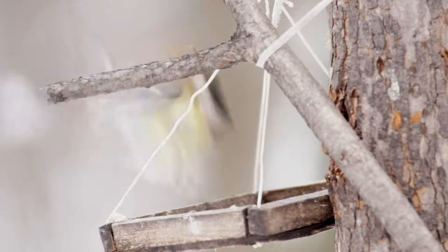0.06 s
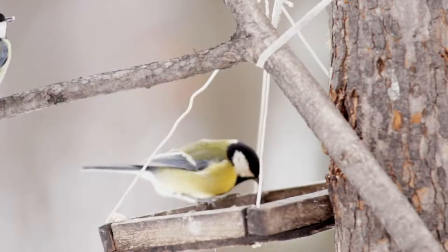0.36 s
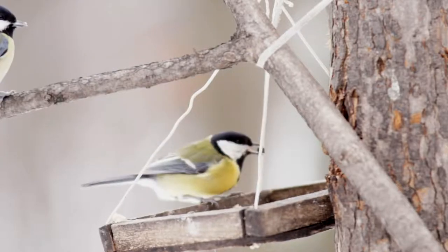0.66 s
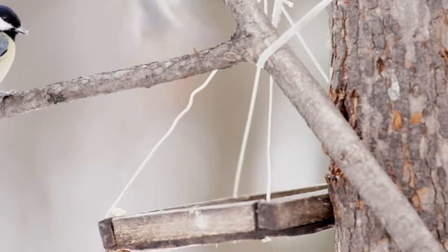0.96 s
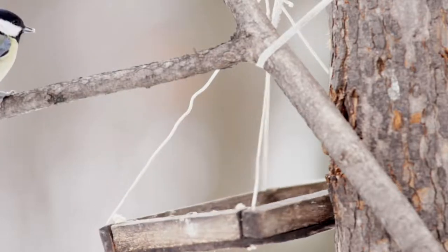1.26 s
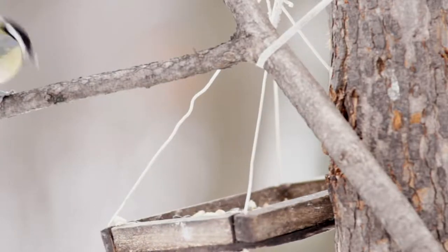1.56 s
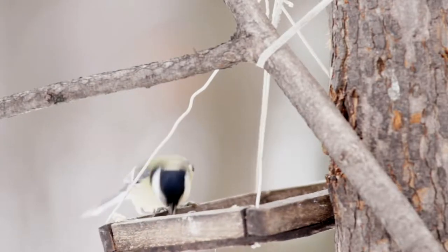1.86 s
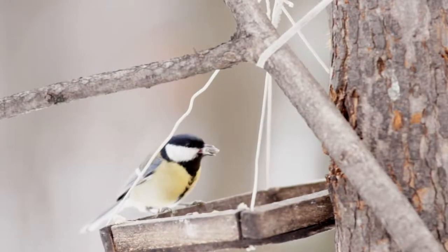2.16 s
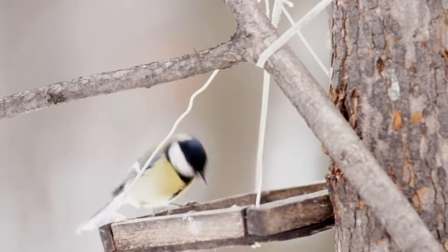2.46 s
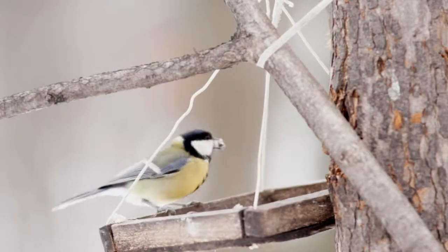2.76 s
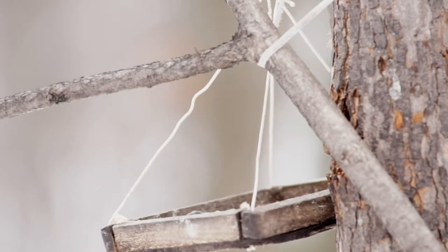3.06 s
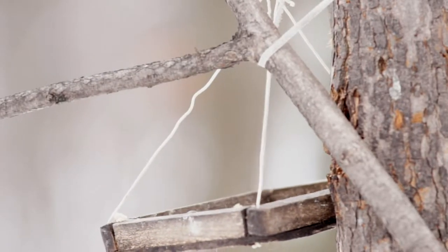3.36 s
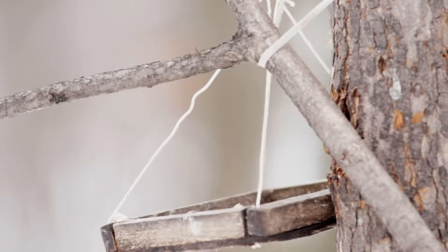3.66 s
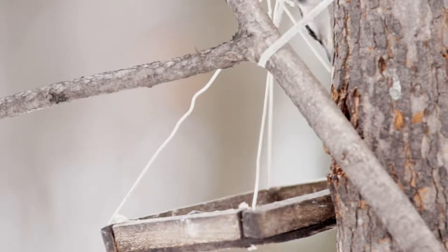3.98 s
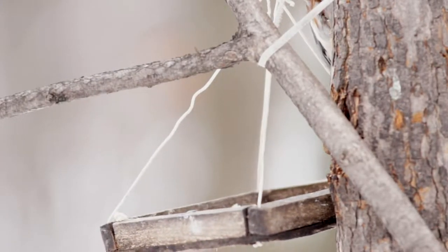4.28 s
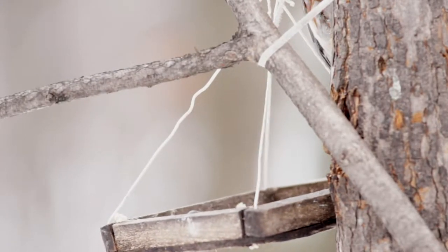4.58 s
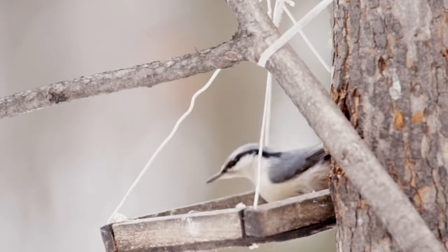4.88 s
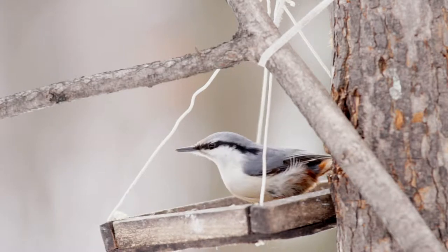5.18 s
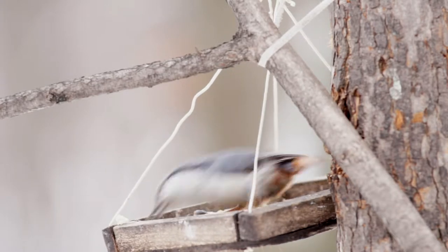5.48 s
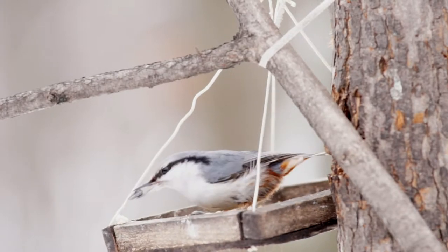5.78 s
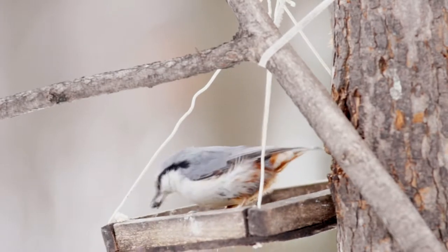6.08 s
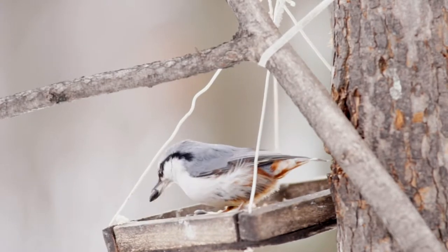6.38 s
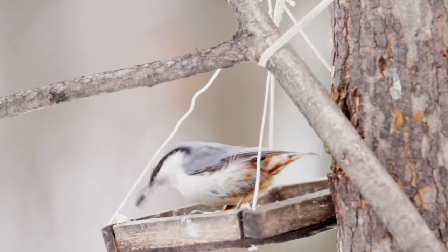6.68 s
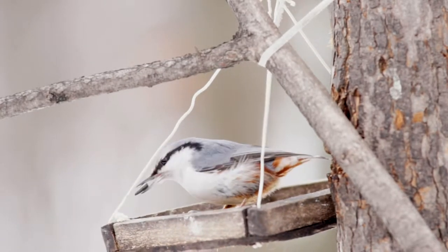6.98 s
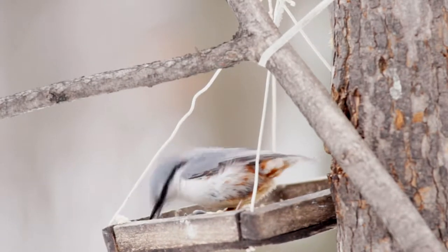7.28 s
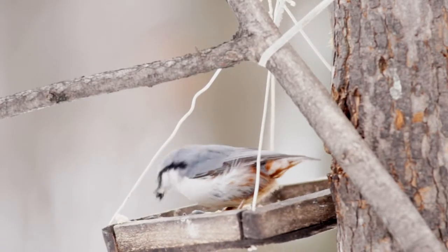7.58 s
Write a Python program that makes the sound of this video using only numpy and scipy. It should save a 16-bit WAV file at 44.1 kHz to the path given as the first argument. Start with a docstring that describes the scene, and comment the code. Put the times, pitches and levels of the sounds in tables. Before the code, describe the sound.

Small birds chirp around a feeder in a wood, over a low hum of distant traffic and a soft hiss. At first, gusts of wind rumble and thud on the microphone. As the wind eases, thin, sharp, very high chirps come close by, mixed with short, softer notes. Beaks and claws tick faintly on the tray and bark, and far birds call very quietly.

```python
"""First comes the hum of far traffic under a soft hiss, with wind thudding on two microphone ports.
Then small birds are heard around a feeder in a winter wood. Beaks and claws tick faintly, far birds
call, and close ones give thin, sharp chirps near 8 kHz and short arched contact notes.
Each call is a whistle from the syrinx, the bird's voice box, scattered by branches and trunks."""
import sys
import numpy as np
from scipy import signal
from scipy.fft import rfft, irfft, next_fast_len
from scipy.io import wavfile
from scipy.ndimage import uniform_filter1d, map_coordinates

SR = 44100
rng = np.random.default_rng(int(sys.argv[2]) if len(sys.argv) > 2 else 0)


def digitize_waveform(pressure):
    """Quantize a signal to 16-bit integers and store it at the path in sys.argv[1].

    Rows of a 2-D input are taken as channels; values are limited to [-1, 1].
    """
    field = np.atleast_2d(pressure).T
    bounded = np.clip(field, -1, 1)
    quanta = np.round(bounded * 32767).astype(np.int16)
    wavfile.write(sys.argv[1], SR, quanta)


N = 341334

# the tone colour of each noise: f/Hz, relative level/dB
TRAFFIC_COLOUR = [(30, -2.5), (110, -6), (170, -0.5), (230, 1), (300, -0.5), (400, -4.5), (650, -6.5),
                  (1000, -6), (1500, -11), (2000, -18.5), (3000, -33), (6000, -61)]
HISS_COLOUR = [(500, -43), (2000, 4), (3000, 1.5), (4000, -3.5), (5200, -1.5), (8000, -3.5), (11500, -5),
               (15500, -8)]
RUSTLE_COLOUR = [(800, -34), (2000, -2), (4000, 1), (6000, -7.5), (10000, -11.5), (15500, -15)]
WIND_COLOUR = [(10, -26), (22, -7.5), (45, 3.5), (70, 1.5), (110, -2), (170, -8), (260, -18.5), (450, -48),
               (1500, -90)]
# how alike left and right are: f/Hz, likeness (1 = the same, 0 = unrelated)
BACKGROUND_LIKENESS = [(60, 1), (290, 0.94), (640, 0.48), (1410, 0.25), (3100, -0.3), (6800, -0.089),
                       (15000, -0.14)]
WIND_LIKENESS = [(40, .75), (90, .5), (160, 0)]
# the low background hum, which wavers slowly and drops abruptly near 3.1 s: t/s, relative level/dB
HUM_LEVELS = [(0.2, -53), (0.22, -52.5), (0.55, -52.5), (1.85, -52), (2.18, -50), (2.38, -52.5),
              (3.02, -51.5), (3.1, -54), (6.13, -53.5), (6.24, -52), (6.57, -53), (7.6, -54)]
# bouts of rustling and gusts of wind: peak t/s, level/dB, half length/s
RUSTLE_BOUTS = [(2.7, -65, 0.37), (3.92, -61, 0.18), (4.52, -64.5, .08), (5.75, -59, 0.087),
                (6.2, -61, 0.24)]
WIND_GUSTS = [(.26, -42.5, 0.11), (.67, -42.5, .04), (.94, -38.5, 0.078), (1.29, -43, 0.049),
              (1.65, -45, .15), (2.01, -35.5, 0.047), (2.24, -43, 0.13), (2.78, -39.5, 0.16),
              (4.44, -46, 0.21), (4.76, -40.5, 0.067), (5.02, -45.5, 0.055), (5.35, -52.5, 0.11),
              (6.97, -49.5, .06)]
# the wind between gusts: t/s, level/dB
WIND_LULLS = [(0, -58.5), (2.9, -53), (3.1, -71), (3.7, -66), (4.3, -62), (5.9, -63.5), (6.2, -56),
              (7.3, -61.5), (7.7, -51.5)]
# beak and claw taps: t/s, peak level/dB, centre f/Hz, width/octaves, time to fade 60 dB/s
TAPS = [(.7665, -38.5, 12100, 0.62, .012), (2.8545, -44, 10000, .7, .012), (3.979, -51, 2600, .4, .03),
        (4.0951, -42, 2400, .12, .028), (4.1974, -45, 2500, .12, .028), (4.51, -45, 7000, 1, .025),
        (6.528, -46, 6960, 0.99, .025), (6.9844, -46, 11000, .5, .01), (7.4660, -43.5, 10900, .55, .012)]
# single puffs of air: t/s, peak level/dB, f/Hz, half length/s
AIR_PUFFS = [(0.983, -29.5, 65, 0.0075), (1.778, -27.5, 91, 0.0076), (2.094, -28, 110, 0.0088),
             (2.56, -27, 85, 0.0058), (2.678, -32, 70, 0.013), (2.822, -31.5, 131, .008),
             (3.031, -39, 66.3, .022), (4.799, -28, 104, 0.011), (7.734, -30, 76, .01)]
# sliding calls of far birds: t/s, relative level/dB, start f/Hz, end f/Hz, length/s
FAR_CALLS = [(1.668, -68, 7560, 7300, .04), (1.986, -61, 3900, 3600, .012), (2.149, -58, 3440, 4240, 0.015),
             (2.193, -62, 4900, 4250, .026), (2.71, -66, 7700, 7300, .035), (3.546, -58, 4350, 4250, .011),
             (3.568, -61, 7350, 6600, .018), (3.742, -57.5, 4500, 4960, 0.018),
             (5.145, -62, 4400, 5000, .009), (6.90, -66, 5300, 4360, .03), (7.608, -68, 7900, 7200, .042)]
# faint extra tones in a whistle: multiple of the pitch, relative level/dB
EXTRA_TONES = [(.5, -26.5), (1.5, -27), (2, -24.5)]
# full chirps: t/s, level/dB, crest f/Hz, dip f/Hz, length/s, fade over the call/dB,
# boost of the extra tones/dB, delay at the left port/ms
SHARP_CHIRPS = [(2.199, -62, 8500, 7300, .045, 8, 0, .15), (2.504, -39.5, 8450, 7950, .063, -4, -7, .174),
                (2.979, -46.5, 9100, 7900, .064, 7, -5, .17), (3.203, -34.5, 8570, 7660, .062, 5, -4, .09),
                (3.488, -35, 8400, 7520, .055, 8, -1, .092), (3.683, -37.5, 8280, 7200, .046, 5, -1, .103),
                (4.952, -32.5, 8950, 7880, .062, 4, -7, .086),
                (5.709, -35.5, 9000, 7720, .064, 6, -2, .094), (5.942, -38, 9000, 7350, .058, 8, 2, .096),
                (6.166, -47, 8080, 7050, .054, 7, 7, .125), (7.120, -50.5, 7780, 6700, .054, 6, 11, .138)]
# short arched notes: t/s, level/dB, crest f/Hz, length/s
CONTACT_NOTES = [(3.094, -45.5, 7380, 0.021), (3.371, -51, 7500, 0.028), (3.425, -52, 7340, 0.026),
                 (3.797, -56, 7250, 0.018), (4.202, -62, 7300, .022), (4.902, -53.5, 7300, 0.022),
                 (5.167, -50.5, 7230, 0.021), (6.678, -56, 7440, 0.029)]


def amp(db):
    """Turn decibels into a gain."""
    return 10 ** (np.asarray(db) / 20)


def unit(x):
    """Scale x to an average strength (rms) of 1."""
    return x / np.sqrt(np.mean(x ** 2) + 1e-20)


def along(points, hz):
    """Read a table of f/Hz, value on a log frequency axis."""
    f, values = np.transpose(points)
    return np.interp(np.log(hz + 1), np.log(f + 1), values)


def curve(rows):
    """Join rows of t/s, value with straight lines."""
    return np.interp(np.arange(N) / SR, *np.transpose(rows))


def wobble(rate, size):
    """A smooth curve through `rate` random values a second."""
    return map_coordinates(rng.standard_normal(4000), [np.arange(size) * rate / SR], mode="wrap")


def filtered(x, response):
    """Scale each frequency in x by response(hz)."""
    size = next_fast_len(x.shape[-1] + 8192)
    gains = response(np.fft.rfftfreq(size, 1 / SR))
    return irfft(rfft(x, size) * gains, size)[..., :x.shape[-1]]


def add(track, s, sound):
    """Mix a stereo sound into the track at s seconds."""
    part = track[:, round(s * SR):][:, :sound.shape[-1]]
    part += sound[..., :part.shape[-1]]


def noise(colour, likeness=BACKGROUND_LIKENESS):
    """Stereo noise with a given tone colour and left-right likeness."""
    def response(hz):
        angle = np.arccos(np.clip(along(likeness, hz), -1, 1)) / 2
        return amp(along(colour, hz)) * [np.cos(angle), np.sin(angle)]
    shared, opposite = filtered(rng.standard_normal((2, N)), response)
    return unit(np.array([shared + opposite, shared - opposite]))


def surges(rows, rest_db):
    """A gain that rises from rest in one bell shape for each row."""
    t = np.arange(N) / SR
    power = sum((amp(db) * np.exp(-((t - s) / half) ** 2 / 2)) ** 2 for s, db, half in rows)
    return np.sqrt(amp(rest_db) ** 2 + power)


def traffic(boost_db=4.5):
    """A far road hums through the trees, a little louder on the right."""
    level_db = curve(HUM_LEVELS) + boost_db + .67 * wobble(8, N)
    return amp(level_db) * noise(TRAFFIC_COLOUR) * amp([[-.5], [.5]])


def hiss_and_rustle(hiss_db=-61):
    """A thin, even hiss, and a faint rustle that comes and goes."""
    return amp(hiss_db) * noise(HISS_COLOUR) + surges(RUSTLE_BOUTS, rest_db=-65) * noise(RUSTLE_COLOUR)


def wind(uneven_db=2):
    """Gusts push unevenly on the microphone ports and make them rumble."""
    rumble = noise(WIND_COLOUR, WIND_LIKENESS) * amp(uneven_db * wobble(35, N))
    return surges(WIND_GUSTS, curve(WIND_LULLS)) * unit(rumble)


def ticks():
    """Beaks and claws tap seed, bark and tray: tiny dry cracks and woody knocks."""
    out, t = np.zeros((2, N)), np.arange(SR // 20) / SR
    for s, db, centre_hz, octaves, fade_s in TAPS:
        burst = rng.standard_normal((2, len(t))) * amp(-60 * t / fade_s)
        crack = filtered(burst, lambda hz: np.exp(-(np.log2((hz + 1) / centre_hz) / octaves) ** 2 / 2))
        add(out, s, amp(db) * crack / np.abs(crack).max())
    return out


def puffs():
    """Single puffs of air hit the ports, each with a short, low thud."""
    out, t = np.zeros((2, N)), np.arange(-SR // 20, SR // 20) / SR
    for s, db, hz, half in AIR_PUFFS:
        phase = rng.uniform(0, 2 * np.pi) + .4 * rng.standard_normal((2, 1))
        thud = np.exp(-(t / half) ** 2) * np.cos(2 * np.pi * hz * t + phase)
        add(out, s + t[0], amp(db) * thud)
    return out


def whistle(hz, loudness, pan_db, lag_ms, extra_db, jitter=.0062, flutter_db=-2.8, rasp_db=-28):
    """The syrinx sings a slightly shaky tone; the left port gets it pan_db louder and lag_ms later."""
    size = len(hz)
    hz = hz * (1 + jitter * wobble(774, size))
    side = np.array([[1], [-1]]) / 2  # left, right
    phase = 2 * np.pi * (np.cumsum(hz) / SR - side * hz * lag_ms / 1000)
    extras = 0
    for multiple, db in EXTRA_TONES:
        damping = 1 / np.sqrt(1 + (multiple * hz / 14800) ** 40)  # softens the highest tones
        extras += amp(db + extra_db) * damping * np.sin(multiple * phase + .9 * wobble(600, size))
    # swirling air in the throat adds a faint scratch below the tone
    rasp = amp(rasp_db) * wobble(3500, size) * np.cos(.62 * phase)
    gain = loudness * amp(side * pan_db + flutter_db * wobble(266, size))
    return np.sqrt(2) * (np.sin(phase) + extras + rasp) * gain


def swell(t, length, rise_s, fall_s):
    """Fade a note smoothly in and out."""
    opening = np.sin(np.pi / 2 * np.clip(t / rise_s, 0, 1))
    closing = np.sin(np.pi / 2 * np.clip((length - t) / fall_s, 0, 1)) ** 2
    return opening * closing


def tree_echo(sound, branches_db, trunks_db, branches_s=.08, trunks_s=.37):
    """The direct sound, a quick echo from nearby branches and a longer one from the trunks."""
    t = np.arange(SR // 2) / SR
    branches, trunks = rng.standard_normal((2, 2, len(t)))
    branches = branches * amp(-60 * t / branches_s) * (1 - np.exp(-t / .0035))
    trunks = trunks * amp(-60 * t / trunks_s) * (1 - np.exp(-t / .0027))
    echoes = (amp(branches_db) * unit(branches) + amp(trunks_db) * unit(trunks)) / np.sqrt(len(t))
    direct = t == 0
    return signal.fftconvolve(sound, direct + echoes, axes=1)


def far_calls(trim_db=-7):
    """Far birds sing faint, scratchy slides, half lost in their own echo."""
    out = np.zeros((2, N))
    for s, db, start_hz, end_hz, length in FAR_CALLS:
        t = np.arange(int(length * SR)) / SR
        hz = start_hz + (end_hz - start_hz) * t / length
        loudness = amp(db + trim_db) * swell(t, length, rise_s=.00098, fall_s=.0013)
        call = whistle(hz, loudness, pan_db=6, lag_ms=0, extra_db=-8, jitter=.011)
        add(out, s, tree_echo(call, branches_db=-1, trunks_db=-2))
    return out


def glide(t, times, pitches):
    """A pitch path with rounded corners, since the syrinx cannot turn at once."""
    return uniform_filter1d(np.interp(t, times, pitches), SR // 200, mode="nearest")


def chirps(close_db=-35, attack_s=.018, attack_db=15.5, flick_s=.05, flick_hz_per_s=65000):
    """The pitch shoots up, dips, rests a little higher and, in longer calls, flicks up at the end."""
    out = np.zeros((2, N))
    for s, db, crest_hz, dip_hz, length, fade_db, extra_db, lag_ms in SHARP_CHIRPS:
        t = np.arange(int(length * SR)) / SR
        rest_hz = dip_hz + .3 * (8700 - dip_hz)
        pitches = [.56 * crest_hz, .97 * crest_hz, 1.015 * crest_hz, dip_hz, dip_hz, rest_hz]
        hz = glide(t, [0, .0095, .0135, .025, .03, .04], pitches)
        hz += flick_hz_per_s * np.maximum(t - flick_s, 0)
        opening_db = -attack_db * np.clip(1 - t / attack_s, 0, 1) ** 1.3
        level_db = db + opening_db - fade_db * (t / length - .2)
        loudness = amp(level_db) * swell(t, length, rise_s=.003, fall_s=.0076)
        pan_db = 85 * (.105 - lag_ms)  # the later the left port hears it, the fainter it is there
        # a bird farther off or turned away is heard with less scratch and more echo
        fainter_db = close_db - db
        call = whistle(hz, loudness, pan_db, lag_ms, extra_db, rasp_db=-22.5 - fainter_db)
        echo_db = -11.5 + .52 * fainter_db
        add(out, s, tree_echo(call, branches_db=echo_db, trunks_db=echo_db - 3.5))
    return out


def contact_notes():
    """Close birds whistle soft notes, each one quick arch of pitch."""
    out = np.zeros((2, N))
    for s, db, crest_hz, length in CONTACT_NOTES:
        t = np.arange(int(length * SR)) / SR
        hz = crest_hz * glide(t, [0, .007, .012, .023], [.77, .96, 1.02, .87])
        loudness = amp(db) * swell(t, length, rise_s=.0037, fall_s=.0057)
        note = whistle(hz, loudness, pan_db=-.5, lag_ms=.13, extra_db=12)
        add(out, s, tree_echo(note, branches_db=-13, trunks_db=-17))
    return out


def scene():
    """Far traffic and wind, with the birds on top."""
    background = traffic() + hiss_and_rustle() + wind()
    return background + ticks() + puffs() + far_calls() + chirps() + contact_notes()


def record(dry, start_s=.117, top_hz=15800):
    """The sound starts after a moment of silence and holds nothing above top_hz."""
    fade_in = np.clip((np.arange(N) / SR - start_s) / .005, 0, 1)
    return filtered(dry * fade_in, lambda hz: hz < top_hz)


dry = scene()
out = record(dry)
digitize_waveform(out)
```